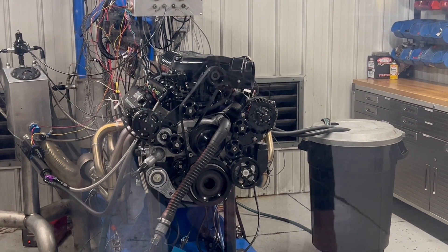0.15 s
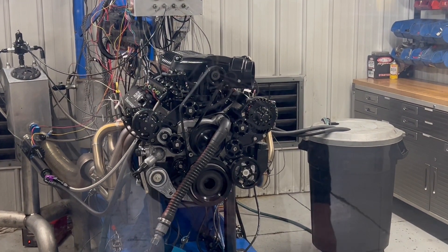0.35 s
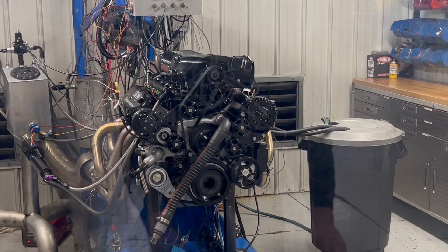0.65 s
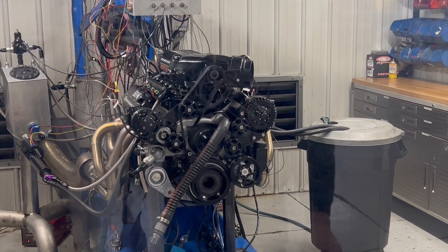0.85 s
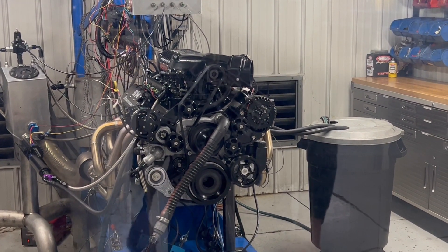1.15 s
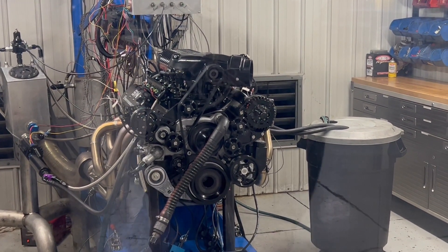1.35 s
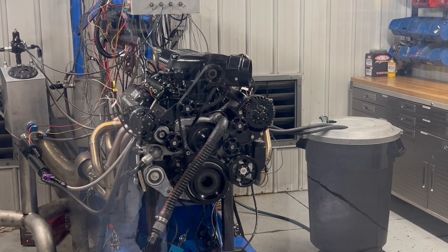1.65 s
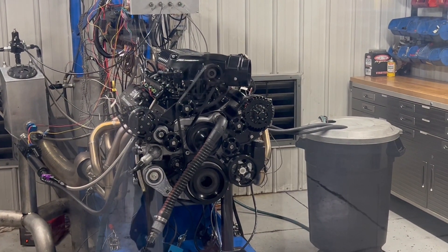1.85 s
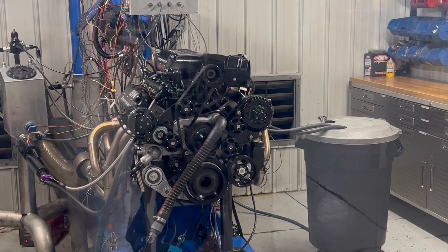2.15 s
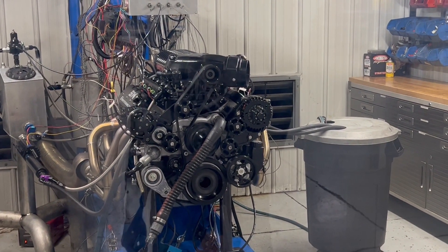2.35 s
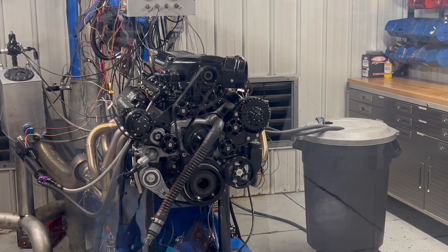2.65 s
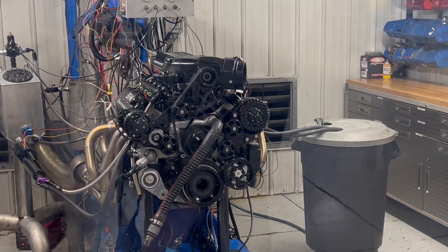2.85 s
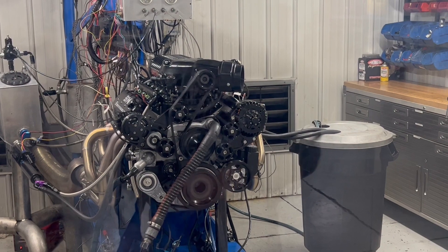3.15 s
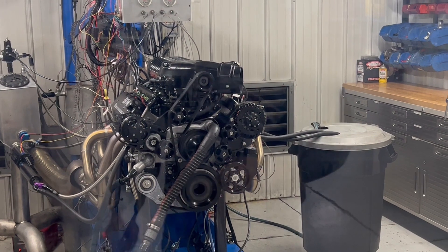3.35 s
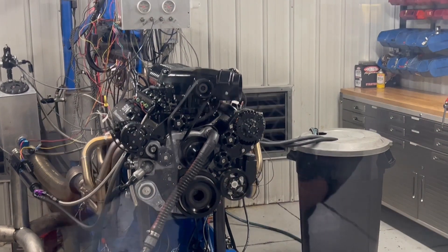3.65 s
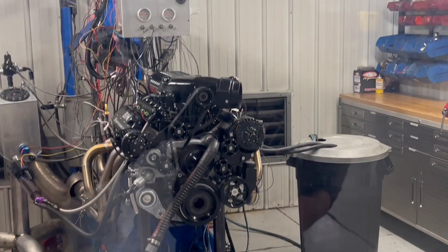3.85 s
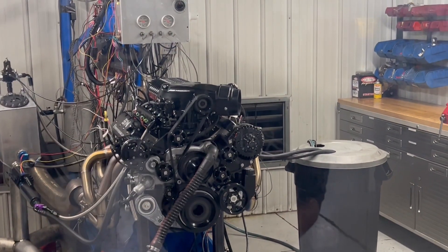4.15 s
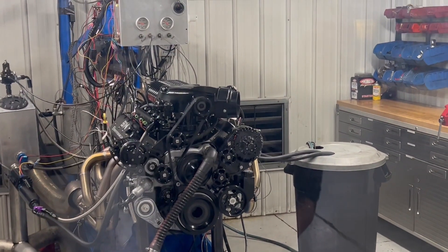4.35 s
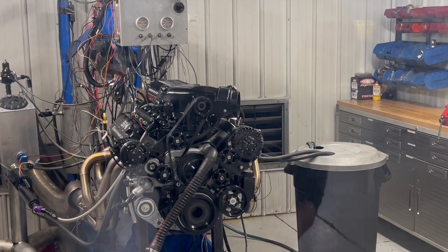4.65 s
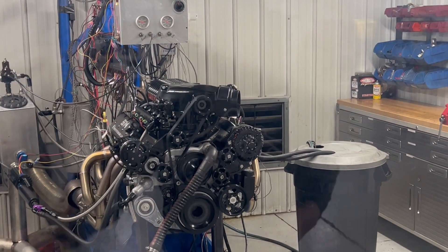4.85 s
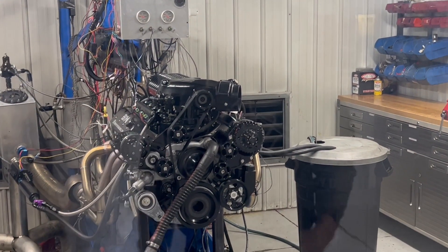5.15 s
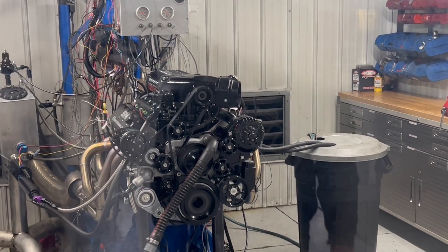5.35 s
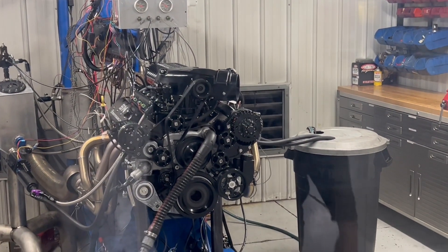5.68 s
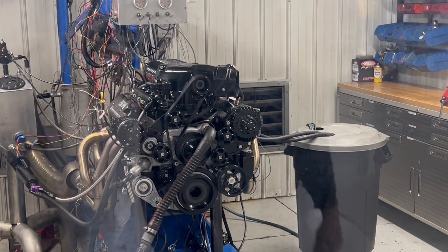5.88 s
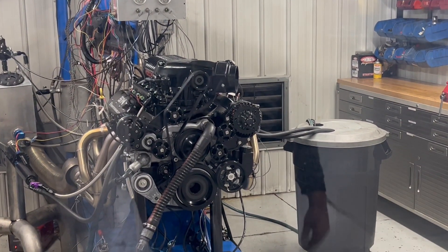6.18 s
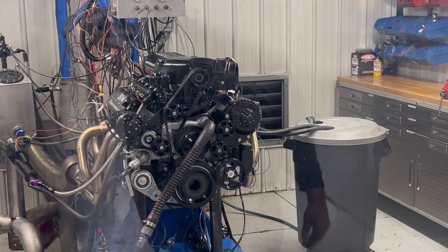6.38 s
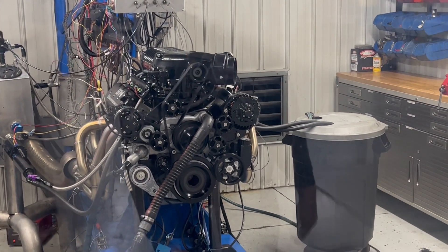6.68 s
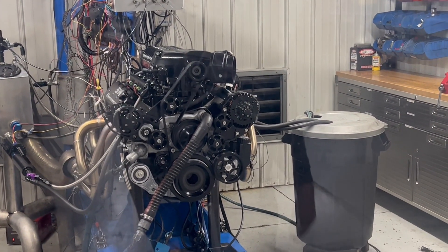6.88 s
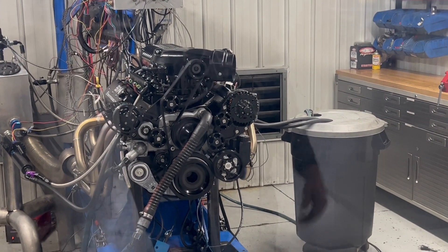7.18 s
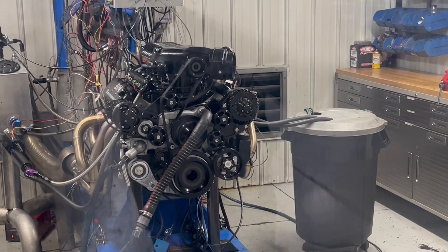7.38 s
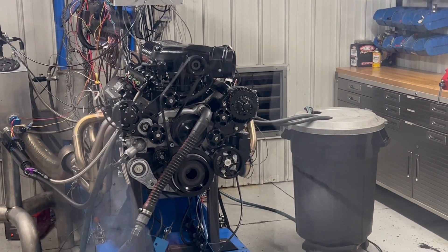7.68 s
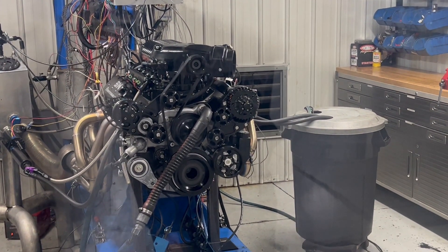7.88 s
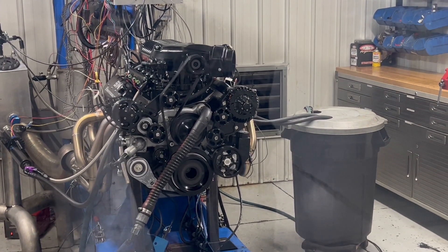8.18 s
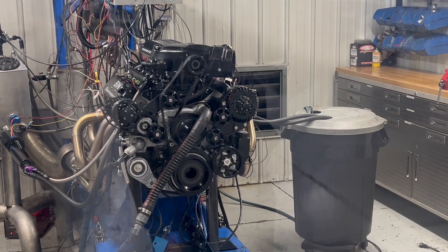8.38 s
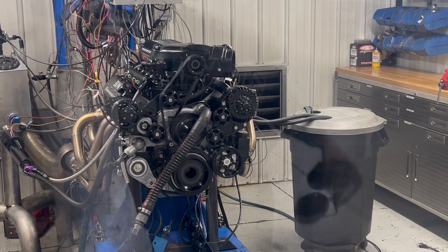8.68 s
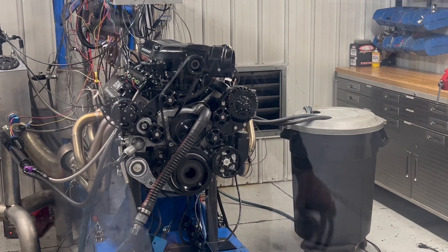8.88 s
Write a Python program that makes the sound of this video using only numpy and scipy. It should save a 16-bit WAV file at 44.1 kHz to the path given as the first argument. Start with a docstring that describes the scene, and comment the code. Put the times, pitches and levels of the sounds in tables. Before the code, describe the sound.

Continuous low exhaust rumble from a big engine indoors, picked up fairly close in stereo. At first it is fast and fairly even, with small stumbles and a thin whine above. Then it slows, turning into an uneven lope with hard bassy thumps and short surges. It grows much louder by the end, with denser valve clatter, buzzing sheet metal, bursts of rattle and a few sharp metallic ticks.

```python
"""A cross-plane V8 on a test stand in a workshop runs at a fast idle, beside a whining pump and a humming fan.
Its exhaust booms as multiples of the cycle in the pipes; puffs growl in the headers and turbulence rushes.
Noise bursts make the valves tick, the driveline rattle and a heat shield buzz; stumbles and hard burns follow.
The speed sags to a loping slow idle that hunts in short surges and grows louder; the steel then rattles
harder in fits, and loose parts knock."""
import sys
import numpy as np
from scipy import signal
from scipy.fft import rfft, irfft, next_fast_len
from scipy.io import wavfile
from scipy.ndimage import map_coordinates

SR = 44100
rng = np.random.default_rng(int(sys.argv[2]) if len(sys.argv) > 2 else 0)


def transcribe(signal):
    """Save signal, clipped to [-1, 1], as a 16-bit WAV file at the path in sys.argv[1]."""
    frames = np.atleast_2d(signal).T
    limited = np.clip(frames, -1, 1)
    pcm = np.round(limited * 32767).astype(np.int16)
    wavfile.write(sys.argv[1], SR, pcm)


N = 398223


def amp(db):
    """Logarithmic level: decibels become a linear gain."""
    return 10 ** (np.asarray(db) / 20)


def unit(x):
    """Normalisation of power: the signal is scaled to rms 1."""
    return x / np.sqrt(np.mean(x ** 2) + 1e-20)


def along(points, hz):
    """Logarithmic frequency scale: (Hz, value) points are interpolated on it."""
    f, v = np.transpose(points)
    return np.interp(np.log(hz + 1), np.log(f + 1), v)


def curves(rows):
    """Linear interpolation: one value per sample for each column after the time."""
    s, *columns = np.transpose(rows)
    t = np.arange(N) / SR
    return [np.interp(t, s, column) for column in columns]


def wobble(rate):
    """Band-limited fluctuation: a smooth random curve with rate knots a second."""
    knots = rng.standard_normal(int(N * rate / SR) + 4)
    return map_coordinates(knots, [np.arange(N) * rate / SR])


def filtered(x, response):
    """Linear filtering: the spectrum of x is multiplied by a response of frequency."""
    size = next_fast_len(N + SR // 2)
    hz = np.fft.rfftfreq(size, 1 / SR)
    return irfft(rfft(x, size) * response(hz), size)[..., :N]


def ring(x, spectrum, size=16384):
    """Minimum-phase resonance: a folded cepstrum gives a causal body with the given spectrum."""
    level_db = along(spectrum, np.fft.rfftfreq(size, 1 / SR))
    cepstrum = irfft(np.log(amp(level_db)))
    cepstrum[1:size // 2] *= 2
    cepstrum[size // 2 + 1:] = 0
    impulse_response = irfft(np.exp(rfft(cepstrum)))
    return signal.fftconvolve(x, impulse_response)[:N]


def passes(turns):
    """Phase crossing: the samples at which a growing count passes a whole number."""
    return np.flatnonzero(np.diff(np.floor(turns)) > 0)


# likeness of left and right, 1 being identical: frequency_hz, likeness
LIKENESS = [(100, 1), (250, 0.71), (500, 0.84), (800, .5), (1150, 0.5), (2000, 1), (4000, 0.9),
            (7000, 0.93), (12000, 0.98)]


def spread(pair):
    """Interaural coherence: two unrelated signals are mixed into a left and right of given likeness."""
    def mix(hz):
        angle = np.arccos(np.clip(along(LIKENESS, hz), -1, 1)) / 2
        return np.array([np.cos(angle), np.sin(angle)])

    mid, side = filtered(pair, mix)
    return unit(np.array([mid + side, mid - side]))


def coloured(pair, spectrum):
    """Spectral shaping: a pair of signals takes the given spectrum, in stereo at rms 1."""
    return spread(filtered(pair, lambda hz: amp(along(spectrum, hz))))


def chatter(at, sizes, t60):
    """Impact noise: the energy of every contact dies away and shapes a pair of unrelated noises."""
    t = np.arange(SR // 8) / SR
    decay = amp(-60 * t / t60)
    energy = signal.fftconvolve(np.bincount(at, sizes ** 2, N), decay ** 2)[:N]
    return unit(np.sqrt(np.abs(energy)) * rng.standard_normal((2, N)))


def held(s, length, attack_s=.008, release_s=.065):
    """Amplitude envelope: a fast linear onset, a hold and a linear release."""
    t = np.arange(N) / SR
    onset = (t - s) / attack_s
    release = 1 - (t - s - length) / release_s
    return np.clip(np.minimum(onset, release), 0, 1)


# the sound dips slightly at the foot of the sag, then grows ever louder: time_s, swell_db
LOUDNESS = [(3.15, 0), (3.42, -0.5), (3.9, 0.5), (4.3, 1.55), (5.2, 2.46), (6.2, 4.5), (7.2, 5.5), (8.5, 8),
            (8.92, 10)]
# the firing rates at which layer levels are given, from slow to fast idle: rate_hz
IDLE_RATES = [78, 95, 100, 105]


def level(rate, idle_db, swell_share):
    """Sound level: it depends on the firing rate and takes a share of the swell, all in dB."""
    return np.interp(rate, IDLE_RATES, idle_db) + swell_share * curves(LOUDNESS)[0]


# fast idle, sag and slow idle, both before the surges: time_s, firing_rate_hz, firing_tone_db
ENGINE_SPEED = [(0, 109.9, -22.5), (.1, 105, -25.5), (.22, 103.4, -42), (.44, 99.94, -37), (.8, 99.15, -48),
                (1.0, 100.6, -42), (1.13, 101.8, -31.5), (1.5, 103.7, -32), (1.85, 106, -26),
                (2.1, 102.7, -33), (2.54, 99.16, -39.5), (2.61, 96.8, -34.5), (2.78, 94.56, -34.5),
                (3.17, 88.53, -27.5), (3.4, 75, -33), (3.7, 73.82, -38), (4.5, 75.76, -37.5),
                (5.1, 73.13, -36.5), (6.45, 74.75, -33), (6.77, 75.53, -29.5), (7.1, 74.65, -31.5),
                (7.85, 75.39, -31), (8.4, 75.2, -27), (9.03, 76.5, -25.5)]


def crankshaft(surge_db):
    """Phase is the integral of frequency: the firing rate, lifted by the surges, counts the firings."""
    steady_hz, tone_db = curves(ENGINE_SPEED)
    rate = steady_hz + 0.61 * surge_db  # Hz per dB of surge
    return rate, np.cumsum(rate) / SR, tone_db


# multiples of the two-turn cycle that sound: multiple
CYCLE_MULTIPLES = (5, 7, 9, 11, 13, 16, 21, 24, 29, 30, 31, 32, 48)
# one row per multiple, passed by pipes and room, re the lope, one column per idle rate:
# slowest_db, slow_db, fast_db, fastest_db
MULTIPLE_LEVELS = [(-26, -28, -12.5, -10.5), (-16.5, -18.5, -13, -7.5), (-23, -3, -15, -30),
                   (-7.5, 3, -10.5, -16.5), (-5, -32, -26.5, -24), (-12, -28, -12.5, -24),
                   (-40.5, -32, -18, -21), (-26, -24, -23, -22.5), (-31.5, -33.5, -24.5, -24.5),
                   (-41, -30, -27, -29), (-43.5, -30.5, -25, -32), (-36, -25, -32, -31),
                   (-36.5, -38, -40.5, -41.5)]
# relative response of the exhaust pipes in the room: frequency_hz, level_db
PIPE_RESPONSE = [(22, -48.5), (40, -21), (53, -21.5), (63, -2.5), (72, -3), (84, 2), (95, -3.5), (108, 6.5),
                 (122, 2.5), (138, -1.5), (155, -7), (180, -17), (215, -18), (275, -17), (400, -34.5),
                 (900, -48.5), (4000, -100)]


def exhaust(firings, rate, tone_db, surge_db):
    """Harmonic series of a cycle of eight firings: uneven banks add odd multiples, uneven burns the lope."""
    cycle = 2 * np.pi * firings / 8
    tone = np.sqrt(2) * amp(tone_db + surge_db) * np.sin(2 * np.pi * firings)
    crank_jitter = .018  # radians of the cycle: roughens the high multiples most
    firing_surge_share = .35  # of a surge's dB, taken up by the overtones of the firing rate
    # the multiples line up once a cycle, so one firing stands out from the eight
    banks = np.zeros(N)
    for multiple, levels_db in zip(CYCLE_MULTIPLES, MULTIPLE_LEVELS):
        multiple_db = np.interp(rate, IDLE_RATES, levels_db) + 1.0 * wobble(5.8)
        if multiple % 8 == 0:
            multiple_db += firing_surge_share * (surge_db - surge_db.mean())
        drift = rng.uniform(-0.79, 0.34) + 0.18 * wobble(5.8)
        phase = multiple * cycle + drift + crank_jitter * multiple * wobble(28)
        banks += np.sqrt(2) * amp(multiple_db) * np.sin(phase)
    # each burn is a little stronger or weaker than the mean and thumps the pipes by that much
    at = passes(firings)
    strengths = rng.uniform(-0.95, 1, len(at))
    burns = unit(ring(np.bincount(at, strengths, N), PIPE_RESPONSE))
    lope_db = level(rate, (-33.5, -31.5, -34, -34.5), swell_share=1.06)
    lope = amp(lope_db) * (banks + amp(-2.0) * burns)
    thumps, weak = hard_burns(firings)
    return thumps + weak * stumbles() * (tone + lope)


# relative resonances of the header tubes: frequency_hz, level_db
HEADER_TUBES = [(150, -35.5), (208, -11), (236, 0), (258, -6.5), (283, 1), (315, -4.5), (345, -12),
                (385, -9), (430, -21), (2000, -87)]


def growl(firings, level_db):
    """Resonance of tubes: every burn sends in a noisy puff of its own strength, and they ring in lumps."""
    at = passes(firings)
    strengths = amp(4.0 * rng.standard_normal(len(at)))  # spread in dB
    puffs = chatter(at, strengths, t60=.035)
    return amp(level_db) * spread(np.array([ring(puff, HEADER_TUBES) for puff in puffs]))


# relative spectrum of the gas noise: frequency_hz, level_db
GAS_SPECTRUM = [(120, -26.5), (200, -4.5), (295, -2.5), (400, -1.5), (600, -5), (900, -8), (1400, -15.5),
                (2200, -28.5), (5000, -42), (12000, -72)]


def gas_rush(firings, level_db):
    """Turbulence noise in intake and headers: it pulses three times a cycle as the banks take turns."""
    cycle = 2 * np.pi * firings / 8
    bank_pulse_db = .9 * np.cos(3 * cycle)
    firing_pulse_db = .5 * np.cos(2 * np.pi * firings)
    gain = amp(bank_pulse_db + firing_pulse_db + 0.65 * wobble(25))
    return amp(level_db) * coloured(gain * rng.standard_normal((2, N)), GAS_SPECTRUM)


# upper middle band of the valve train, before the fits: time_s, level_db
VALVE_TRAIN_LEVEL = [(0.1, -65.5), (0.67, -64.5), (3.5, -64), (4.39, -60), (7.3, -57), (8.85, -54.5),
                     (8.95, -50)]


def valve_train_level():
    """Summation over bands: the whole band lies a little above its upper middle part, in dB."""
    return curves(VALVE_TRAIN_LEVEL)[0] + 0.54


# relative response of the engine block: frequency_hz, level_db
BLOCK_RESPONSE = [(500, -20), (1200, -3), (1900, -1.5), (2400, -.5), (2800, -2), (3400, -1.5), (4600, -7),
                  (5300, -5.3), (5800, -6.8), (7000, -8.3), (8500, -15.5), (10000, -23), (12000, -23.5),
                  (15600, -33)]


def valves(firings, level_db):
    """Impact radiation: two valves seat per firing and tick through the block, over belt and chain hiss."""
    at = passes(2 * firings + .2 * wobble(90))
    ticks = chatter(at, amp(3 * rng.standard_normal(len(at))), t60=.03)
    hiss = rng.standard_normal((2, N))
    return amp(level_db) * coloured(amp(-4.5) * ticks + hiss, BLOCK_RESPONSE)


def rattle(unevenness_rate, t60):
    """Random impacts: loose steel touches at an uneven rate and with uneven force."""
    contact_rate = 330 * amp(4 * wobble(unevenness_rate))  # contacts a second
    at = passes(np.cumsum(contact_rate) / SR)
    return chatter(at, amp(3.5 * rng.standard_normal(len(at))), t60)


# relative spectrum of the steel parts: frequency_hz, level_db
STEEL_SPECTRUM = [(1500, -22), (3200, 4), (4800, 1), (7300, 3.5), (8800, -1), (10000, -2), (11700, 1),
                  (13500, -3), (15600, -10)]


def driveline(level_db):
    """Reverberant impact noise: slack steel parts chatter in dense contacts, blurred by the room."""
    return amp(level_db) * coloured(rattle(200, t60=.075), STEEL_SPECTRUM)


# relative resonances of a thin heat shield: frequency_hz, level_db
SHIELD_RESONANCES = [(2400, -22), (2850, -6), (2960, -10), (3080, 0), (3250, -7), (3480, 1), (3630, -6),
                     (3780, -2), (4200, -22), (6000, -45)]


def shield(level_db, lift_db):
    """Plate resonance: a thin heat shield buzzes in a few close modes, more strongly in most fits."""
    share = np.clip(0.66 + 0.29 * lift_db, 0, 1)
    full_db = level_db - 5  # re the valve train
    return amp(full_db) * share * coloured(rattle(120, t60=.025), SHIELD_RESONANCES)


# ripple of the pump shaft, before its flutter: time_s, ripple_hz
PUMP_RIPPLE = [(0, 776.5), (1.6, 775), (1.9, 779), (2.3, 774.5), (3.05, 777), (3.38, 776), (3.48, 767),
               (5.2, 764.5), (7, 766.5), (9, 765.5)]
# firing rates for the level columns of the whine: rate_hz
WHINE_RATES = [78, 86, 100, 105]
# whine, one level per firing rate, before singing, flutter and swell:
# multiple, slowest_db, slow_db, fast_db, fastest_db
WHINE_LEVELS = [(3, -82, -79, -78, -78), (4, -77, -73.5, -75, -77), (6, -78.5, -77.5, -78.5, -78.5),
                (7, -74.3, -77, -78.3, -78.3), (8, -76.3, -75, -76, -75.7)]
# one multiple of the whine sings out: start_s, length_s, multiple, lift_db
WHINE_SINGS = [(.45, .35, 4, 2.5), (.75, .04, 8, 6), (1.83, .04, 8, 4), (2.52, .12, 8, 4),
               (2.93, .38, 4, 8), (3.0, .35, 7, 3), (3.47, .33, 7, 4), (4.33, .15, 7, 3),
               (4.62, .75, 4, 3.5), (6.8, 1.3, 7, 3), (7.6, 1.3, 8, 2.5), (8.46, .46, 7, 4)]
# hum of the fan, before it wavers: pitch_hz, level_db
FAN_HUM = [(891, -72), (1302, -75), (1950, -78)]


def accessories(rate, valve_db):
    """Tones of rotating machines: the fuel pump's whine flutters in harmonics, the fan's hum wavers."""
    pump_hz, = curves(PUMP_RIPPLE)
    pump_phase = 2 * np.pi * np.cumsum(pump_hz + 1.1 * wobble(9) + 1.6 * wobble(110)) / SR
    whine = np.zeros(N)
    for multiple, *levels_db in WHINE_LEVELS:
        whine_db = np.interp(rate, WHINE_RATES, levels_db) + 1.1 * wobble(11) + 2.4 * wobble(40)
        for s, length, singing, lift_db in WHINE_SINGS:
            if singing == multiple:
                whine_db += lift_db * held(s, length)
        whine += amp(whine_db) * np.sin(multiple * pump_phase)
    hum = np.zeros(N)
    for hz, db in FAN_HUM:
        gain = amp(db + 2.0 * wobble(6.7))
        hum += gain * np.sin(2 * np.pi * np.cumsum(hz + 5 * wobble(30)) / SR)
    # the whine swells with the valve train
    whine_swell_db = .65 * (valve_db - valve_db.mean())
    return np.sqrt(2) * (amp(whine_swell_db) * whine + hum)


# a few burns in a row are weaker, and the exhaust dips briefly: centre_s
STUMBLE_TIMES = [1.002, 2.009, 2.176, 3.209, 3.362, 4.473, 5.5, 5.785, 6.124, 6.757, 7.327, 7.578, 8.501]


def stumbles():
    """Amplitude modulation: the gain of tone and lope drops for a moment at each stumble."""
    t = np.arange(N) / SR
    depth_db, width_s = -4.5, .026
    return amp(depth_db * sum(np.exp(-((t - s) / width_s) ** 2) for s in STUMBLE_TIMES))


# one cylinder burns hard, and its neighbours weakly; the thump alone lies 3 dB lower: time_s, peak_db
HARD_BURN_TIMES = [(2.445, -21), (2.755, -18), (3.097, -19), (3.497, -18.5), (3.67, -21), (3.779, -20.5),
                   (3.821, -18), (4.094, -19.5), (4.239, -20), (4.279, -17.5), (4.402, -20.5), (4.589, -20),
                   (4.714, -20), (4.819, -18), (4.926, -18), (5.034, -19), (5.553, -17.5), (5.633, -18.5),
                   (5.901, -20), (6.214, -17), (7.446, -16), (7.486, -17), (7.611, -14), (7.897, -14),
                   (8.022, -11), (8.947, -14.5)]
# relative spectrum of one thump: frequency_hz, level_db
THUMP_SPECTRUM = [(30, -40), (55, -16), (68, -1), (108, 0), (130, -4), (155, -13), (190, -30), (280, -34),
                  (500, -55), (2000, -100)]


def hard_burns(firings):
    """Impulse response: a thump on the firing nearest each time, and the gain of the weak burns around it."""
    t, at = np.arange(N) / SR, passes(firings)
    depth_db, width_s = -4, .016
    blows, weak = np.zeros(N), np.zeros(N)
    for s, peak_db in HARD_BURN_TIMES:
        i = at[np.argmin(np.abs(at / SR - s))]
        blows[i] = amp(peak_db - 3)
        weak += np.exp(-((t - i / SR) / width_s) ** 2)
    thumps = filtered(blows, lambda hz: -1j * amp(along(THUMP_SPECTRUM, hz)))
    # the highest peak of the thumps is that of the strongest blow
    return thumps * blows.max() / np.abs(thumps).max(), amp(depth_db * weak)


# the slow idle hunts, each surge lasting until the next begins: start_s, strength_db
SURGE_TIMES = [(3.4, 3), (3.61, 5), (3.909, 7), (4.47, 7), (4.78, 7), (5.48, 10), (5.77, 8), (6.079, 9),
               (6.458, 9.5), (6.76, 9.5), (7.069, 7), (7.35, 7), (7.58, 7), (8.1, 9.5), (8.491, 6.5),
               (8.74, 3.5)]


def surges():
    """Limit-cycle hunting of the slow idle, in dB: one sine arch from each surge's start to the next."""
    t = np.arange(N) / SR
    ends = [s for s, _ in SURGE_TIMES[1:]] + [N / SR]
    surge_db = np.zeros(N)
    for (s, strength_db), end in zip(SURGE_TIMES, ends):
        surge_db += strength_db * np.sin(np.pi * np.clip((t - s) / (end - s), 0, 1))
    return surge_db


# the driveline rattles and shakes the valve train, before flutter:
# start_s, length_s, rattle_lift_db, clatter_lift_db
RATTLE_FITS = [(4.333, 0.044, 2, 4), (4.54, 0.05, 8, 2.2), (4.968, 0.12, 3.5, 0.5), (5.567, 0.048, 4, 1.5),
               (5.81, .15, 4.5, 2), (6.161, 0.071, 7, 3.5), (6.338, 0.032, 6.5, 1.5),
               (6.525, 0.062, 4.5, 2.3), (6.796, 0.081, 6.5, 2.5), (7.169, 0.14, 4, 2),
               (7.421, 0.024, 9, 1), (7.73, 0.097, 7, 2), (7.958, .09, 7, 2.5), (8.16, .16, 5.5, 2),
               (8.474, 0.072, 7.5, 3), (8.68, 0.09, 5.5, 2), (8.855, 0.059, 8.5, -0.5)]


def fits():
    """Intermittent vibration: fluttering lifts of rattle and clatter, in dB."""
    flutter = .85 + .2 * wobble(60)
    return flutter * sum(np.outer(lifts_db, held(s, length)) for s, length, *lifts_db in RATTLE_FITS)


# loose parts knock, the width being that of each of two filter passes:
# start_s, peak_db, ring_hz, width_hz, t60_s
KNOCKS = [(4.511, -41.5, 2660, 680, .019), (4.512, -52, 4300, 3000, .008), (4.553, -53, 13000, 4000, .03),
          (5.389, -55, 12500, 4000, .03), (7.796, -49, 11500, 6000, .03), (8.008, -43.5, 3400, 700, .06),
          (8.53, -43, 3200, 700, .06), (8.86, -49, 12500, 4000, .025), (8.884, -47, 8000, 700, .05)]


def loose_part():
    """Band-pass resonance: short metallic ticks of dying noise each ring in one band."""
    t = np.arange(SR // 8) / SR
    f = np.fft.rfftfreq(SR // 4, 1 / SR)
    out = np.zeros(N + SR)
    for s, peak_db, hz, width, t60 in KNOCKS:
        burst = rng.standard_normal(len(t)) * amp(-60 * t / t60)
        band = 1j * f * width / (hz * hz - f * f + 1j * f * width)
        tick = irfft(rfft(burst, SR // 4) * band ** 2)
        out[round(s * SR):][:len(tick)] += amp(peak_db) * tick / np.abs(tick).max()
    return out[:N]


def scene():
    """Superposition: the crankshaft times gas and valves; the gas lies a little to the left."""
    surge_db = surges()
    rattle_fit_db, clatter_fit_db = fits()
    rate, firings, tone_db = crankshaft(surge_db)
    gas_surge_db = 0.092 * surge_db  # the share that rush and growl take
    rush_db = level(rate, (-52, -51, -53, -51), swell_share=0.95) + gas_surge_db
    growl_db = level(rate, (-50.5, -52.5, -55.5, -52.5), swell_share=.54) + gas_surge_db
    rattle_db = level(rate, (-69, -71, -72, -71), swell_share=.56) + rattle_fit_db
    valve_db = valve_train_level()
    gas = exhaust(firings, rate, tone_db, surge_db)
    gas = gas + growl(firings, growl_db) + gas_rush(firings, rush_db)
    metal = valves(firings, valve_db + clatter_fit_db) + driveline(rattle_db)
    metal = metal + shield(valve_db, clatter_fit_db) + loose_part()
    balance = amp([[.6], [-.6]])  # dB left, right
    return balance * gas + metal + accessories(rate, valve_db)


# phase by which the right microphone lags: frequency_hz, lag_rad
PORT_LAG = [(550, 0), (750, .4), (1250, .45), (1600, -.2), (3000, .55), (4200, .6), (5850, -.4), (7500, 0),
            (8600, -1.2), (9300, -2.9), (10700, -3.3), (12700, -6.28)]


def record(dry):
    """Phase response and band limit: the right microphone port turns the treble; the band ends steeply."""
    left, right = filtered(dry, lambda hz: hz < 15700)
    return np.array([left, filtered(right, lambda hz: np.exp(-1j * along(PORT_LAG, hz)))])


dry = scene()
out = record(dry)
transcribe(out)
```